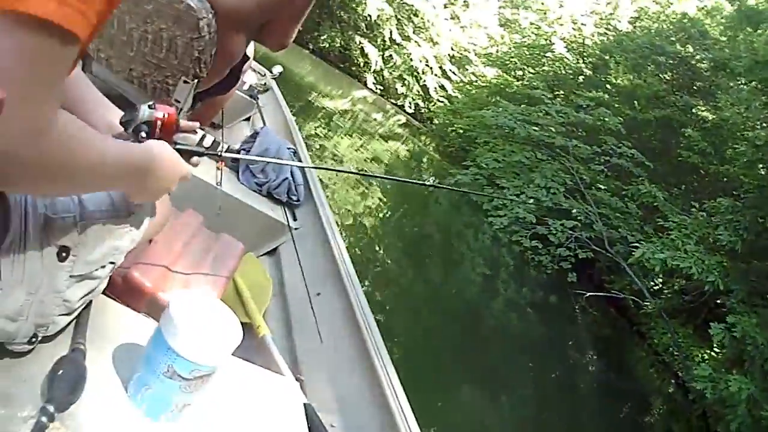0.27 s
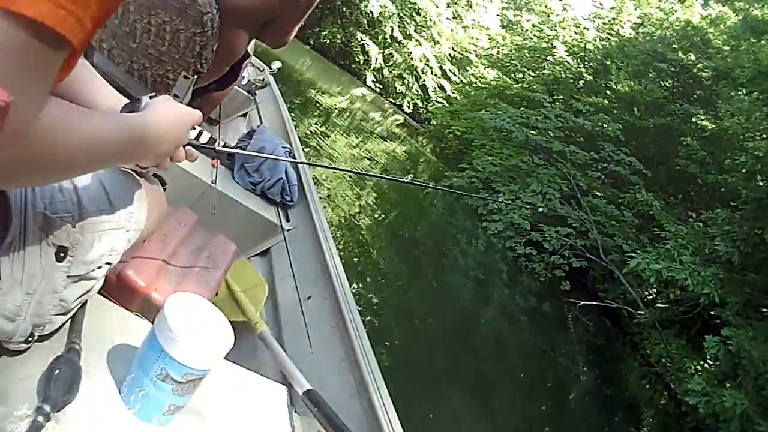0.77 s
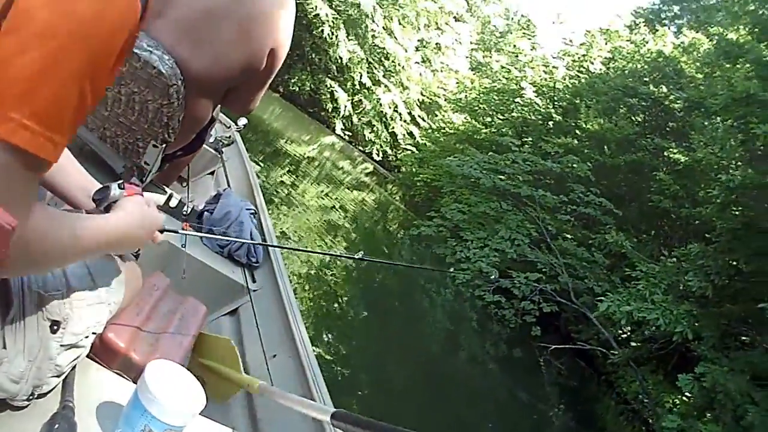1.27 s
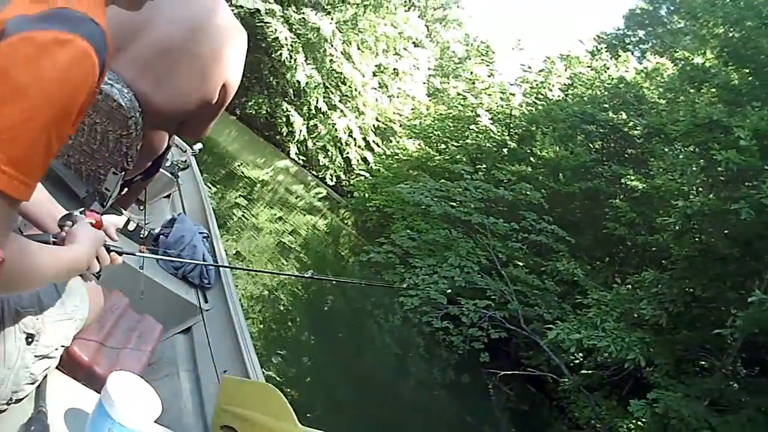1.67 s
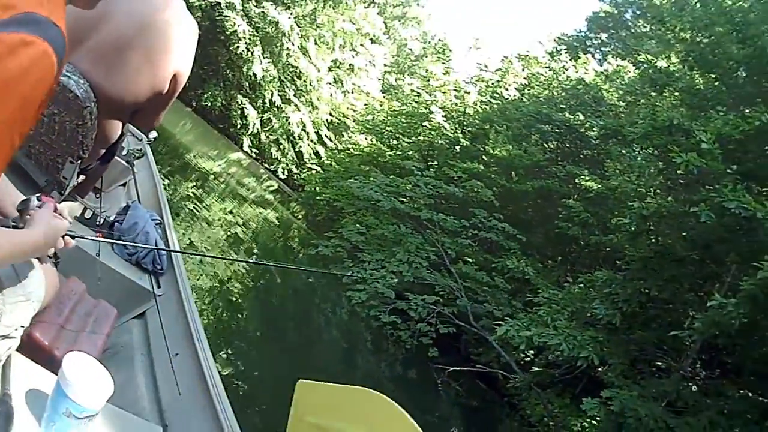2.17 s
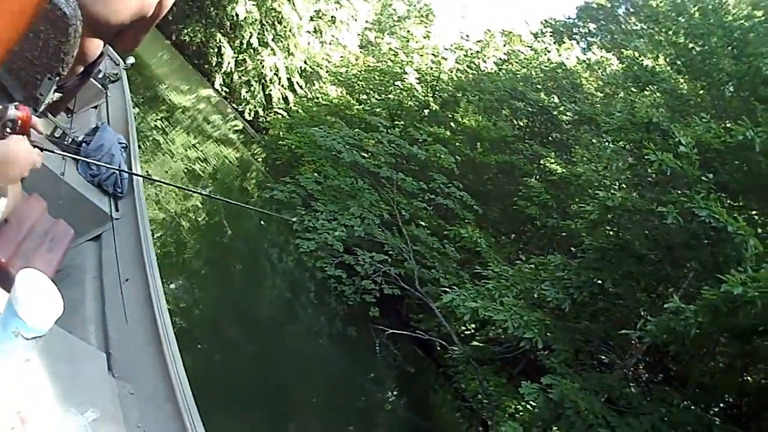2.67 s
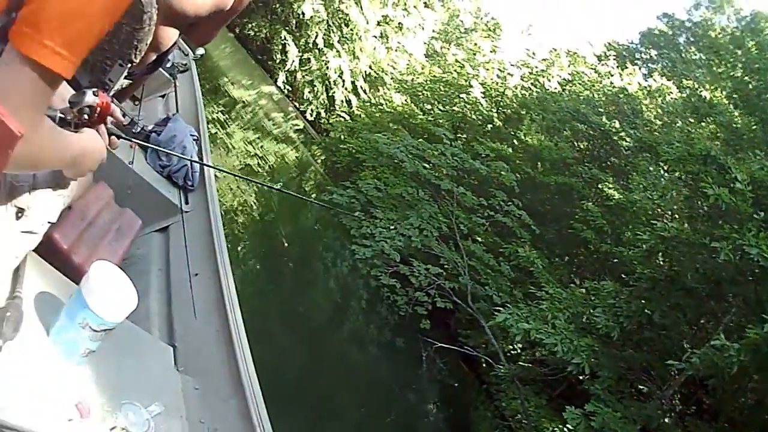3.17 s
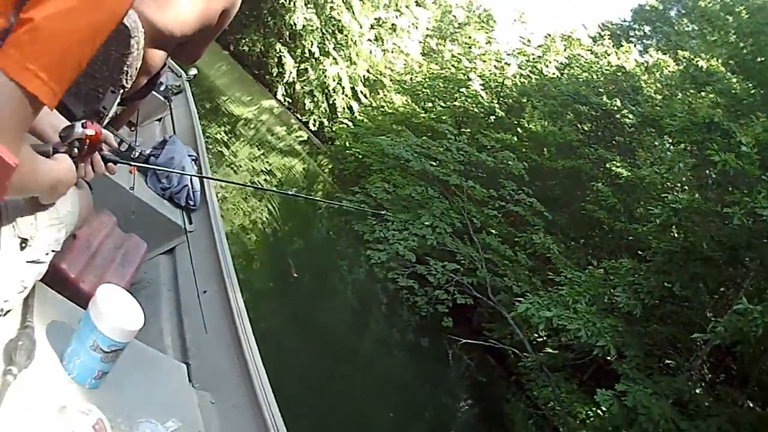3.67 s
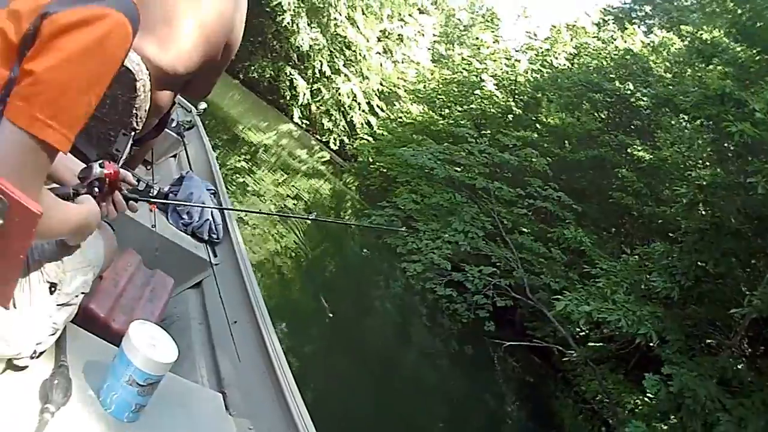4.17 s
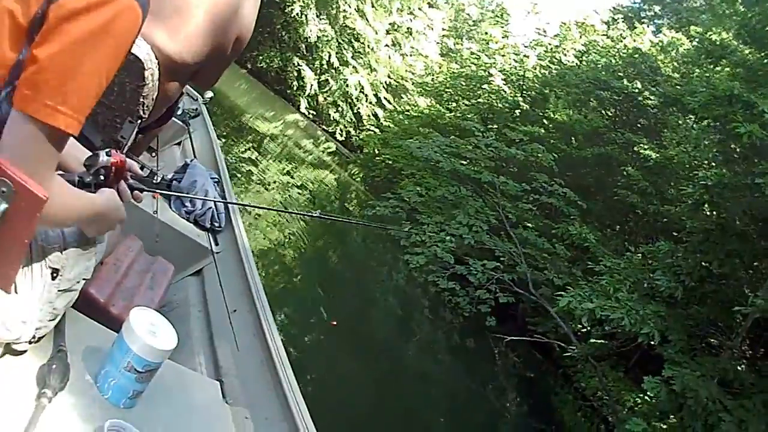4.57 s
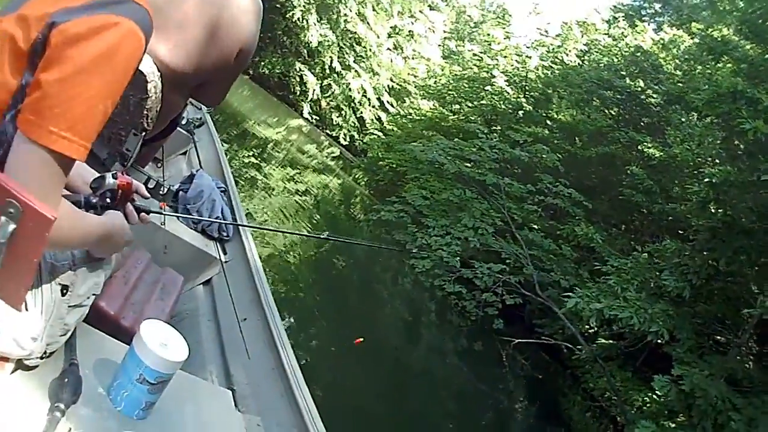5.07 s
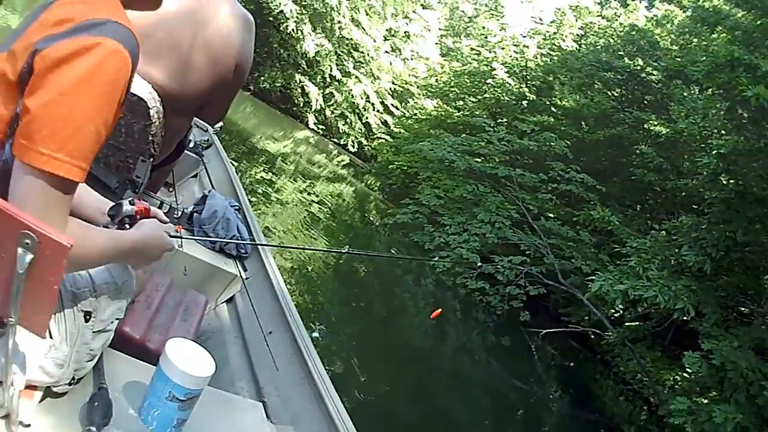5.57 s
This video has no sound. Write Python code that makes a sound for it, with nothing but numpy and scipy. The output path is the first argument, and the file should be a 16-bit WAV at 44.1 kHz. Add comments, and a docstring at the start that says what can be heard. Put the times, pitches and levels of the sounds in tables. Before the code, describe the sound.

A quiet wooded lake heard from inside a thin metal boat through a small, coarse camera microphone, almost mono. A distant cicada chorus holds a faint, narrow, noisy hum near 1 kHz over soft broad air, both slowly sinking. From 0.1 to 0.6 s a seat creaks in dull, low jolts, quickening from about 30 to 50 a second, ending with a light tick. A paddle then scrapes and knocks at 0.95-1.15 s, with a faint slide until 1.5 s. The sharpest clack comes at 1.55-1.65 s, ringing hollow around 300 and 800 Hz. More knocks at 2.12-2.45 s boom near 124 Hz with brief gritty rubs and a brighter tap at 2.35 s. Weak bumps follow at 3.15, 3.3 and 3.6 s. Afterwards only the insect hum and air remain, with soft wind rumbles around 4.4 s and stronger low puffs at 5.3-5.5 s.

```python
"""A seat creaks in slow jolts, then a paddle is dragged, knocked and lifted out of a thin metal boat.
Knocks set hull panels booming and ringing; sliding drives them with dense, uneven slips.
Under it all, cicadas drone near 1 kHz as narrow noise bands and the wooded lake adds smooth broad noise.
Light wind stirs the microphone from the start, with its last gusts after the knocks.
A small camera samples the sound 8000 times a second and joins the samples by straight lines."""
import sys
import numpy as np
from scipy import signal
from scipy.io import wavfile

SR = 44100
rng = np.random.default_rng(int(sys.argv[2]) if len(sys.argv) > 2 else 0)


def voltage_ratio(level):
    """Linear amplitude factor for a level in decibels (scalar or array-like)."""
    return 10 ** (np.asarray(level, float) / 20)


def wav_record(signal):
    """Record a signal, one row per channel, as 16-bit PCM in the file named by sys.argv[1]."""
    frames = np.transpose(np.atleast_2d(signal))
    bounded = np.clip(frames, -1, 1)
    # unit amplitude maps onto the largest positive 16-bit level
    quanta = np.round(bounded * 32767).astype(np.int16)
    wavfile.write(sys.argv[1], SR, quanta)


N = 257544


def rms_one(x):
    """Scale a signal to an rms of 1."""
    return x / np.sqrt(np.mean(x ** 2) + 1e-20)


def noise():
    """White noise over the whole scene."""
    return rng.standard_normal(N)


def butter(x, hz, kind, order=2):
    """Butterworth filter with its corner or corners at hz."""
    return signal.sosfilt(signal.butter(order, hz, kind, fs=SR, output="sos"), x)


def drift(rate_hz):
    """Slow random wander with an rms of 1: 40 joined points a second, low-passed at rate_hz."""
    points = rng.standard_normal(int(N / SR * 40) + 2)
    wander = np.interp(np.arange(N) / SR * 40, np.arange(len(points)), points)
    return rms_one(butter(wander, rate_hz, "low"))


def resonance(x, hz, width_hz):
    """Two-pole band filter: a wider band means a faster dying resonance."""
    r = np.exp(-np.pi * width_hz / SR)
    feedback = [2, -4 * r * np.cos(2 * np.pi * hz / SR), 2 * r * r]
    return signal.lfilter([1 - r * r, 0, r * r - 1], feedback, x)


def ring(clicks, hz, t60_s):
    """A unit click sets a sine of height 1 ringing, down 60 dB after t60_s."""
    r = voltage_ratio(-60 / (t60_s * SR))
    w = 2 * np.pi * hz / SR
    return signal.lfilter([0, np.sin(w)], [1, -2 * r * np.cos(w), r * r], clicks + 1e-18)


def nearness(hz, centre_hz, octaves):
    """Panels far in pitch from the centre are driven less."""
    return 1 / (1 + (np.log2(hz / centre_hz) / octaves) ** 2) ** 2


# ringing hull panels, for knocks and rubs alike: pitch_hz [Hz], level_db [dB], t60_s [s]
HULL_PANELS = [(100, 0.5, 0.74), (125.5, -3, 0.55), (150.4, 4, 0.29), (188, -4.5, 0.48), (231, 0, 0.62),
               (268, -5, 0.32), (294, 1.5, 0.11), (342, 2.5, 0.11), (380, 5, 0.039), (422.6, -6.5, 0.31),
               (486.3, -4, 0.17), (514, 0.5, 0.098), (571, -2, 0.077), (621, -5.5, 0.14), (720, -6.5, 0.12),
               (784.4, 2, 0.091), (823, 4, 0.027), (918, -2.5, 0.18), (1011, -3, 0.064), (1150, -20, 0.094),
               (1368, -13.5, 0.036), (1530, -4, 0.069), (1750, 1, 0.01), (1950, 2.5, 0.036),
               (2110, 1, 0.04), (2220, -1.5, 0.017), (2870, 1.5, 0.018), (2930, 1, 0.028), (3200, -25, .03),
               (3550, 6.5, 0.0049)]
# contacts and rings of the knocks; narrow rows are single panels ringing on, near 124 Hz the whole hull booms:
# start_s [s], level_db [dB], centre_hz of the panels driven [Hz], reach [octaves], crack_db [dB]
KNOCK_RINGS = [(.585, -51, 366, 0.83, -48.5), (0.591, -46.5, 132, 0.43, -72),
               (0.943, -46.5, 430, 1.14, -73), (1.044, -33, 543, 0.75, -48), (1.084, -36.5, 534, 1.33, -42),
               (1.1, -39, 175, 0.41, -73), (1.127, -46, 600, 0.57, -55), (1.553, -45, 750, 0.41, -35.5),
               (1.571, -31.5, 790, 0.52, -28), (1.57, -40.5, 129, 0.4, -60), (1.576, -38, 244, 0.13, -59),
               (1.58, -39, 800, 0.58, -26), (1.587, -27.5, 311, 0.21, -60), (1.651, -38, 1530, 0.91, -58),
               (1.656, -45, 124, 0.61, -70), (1.846, -58, 1970, 0.5, -71), (1.983, -57.5, 2460, 0.61, -56),
               (2.117, -50, 1750, 0.27, -38), (2.136, -36.5, 600, 0.5, -33.5),
               (2.133, -33.5, 124, 0.17, -60), (2.134, -32.5, 342, 0.14, -60), (2.14, -45, 1500, 0.72, -39),
               (2.208, -39.5, 660, 1.83, -26), (2.206, -36.5, 121, 0.38, -50),
               (2.255, -49.5, 270, 0.47, -52), (2.345, -31, 1630, 0.27, -33), (2.342, -39, 475, 0.29, -69),
               (2.34, -41, 170, 0.69, -58), (2.387, -36, 1950, 0.14, -37.5), (2.429, -40.5, 125, 0.22, -73),
               (3.147, -52, 660, 0.89, -48), (3.3, -55.5, 280, 0.32, -58), (3.607, -56, 514, 1.2, -48)]


def knocks():
    """Each row sets the panels near its pitch ringing and gives a short crack."""
    start_s, row_db, centre_hz, octaves, crack_db = np.transpose(KNOCK_RINGS)
    at = np.round(start_s * SR).astype(int)
    chance = rng.random((len(at), len(HULL_PANELS), 3))
    ringing = np.zeros(N)
    for k, (pitch_hz, level_db, t60_s) in enumerate(HULL_PANELS):
        near = voltage_ratio(row_db) * nearness(pitch_hz, centre_hz, octaves)
        # each ring varies by up to 3 dB either way, with random polarity
        strength = voltage_ratio(level_db + 6 * (chance[:, k, 0] - 0.5)) * np.sign(chance[:, k, 1] - 0.5)
        # slow bending waves reach the low panels later
        late = ((0.77 + chance[:, k, 2] * 1.25) / pitch_hz * SR).astype(int)
        clicks = np.zeros(N)
        np.add.at(clicks, at + late, near * strength)
        ringing += ring(clicks, pitch_hz, t60_s)
    cracks = np.zeros(N)
    np.add.at(cracks, at, voltage_ratio(crack_db))
    # a hard first tick, then splintered noise falling 60 dB in 22 ms
    tick = 14 * butter(cracks, [700, 3000], "band", order=1)
    dying = signal.lfilter([1], [1, -voltage_ratio(-60 / (0.022 * SR))], cracks + 1e-18)
    splinters = rms_one(butter(noise(), [800, 3000], "band", order=1)) * dying
    return ringing + tick + splinters


# paddle sliding on metal: start_s [s], end_s [s], level_db [dB, before 20 dB of gain],
# centre_hz of the panels rubbed [Hz], reach [octaves]
PADDLE_RUBS = [(0, 0.084, -72.5, 1960, 1.46), (0.982, 1.065, -70.5, 1220, 0.79),
               (1.029, 1.089, -71, 910, 2.8), (1.087, 1.145, -63, 825, 2.25), (1.132, 1.216, -71, 353, 3.2),
               (1.213, 1.51, -74.5, 1680, 1.5), (1.549, 1.591, -55.5, 970, 2.9),
               (1.587, 1.655, -66, 910, 2.3), (1.646, 1.723, -63.5, 980, 2.46),
               (2.119, 2.201, -65, 1430, 2.3), (2.199, 2.25, -65.5, 1350, 2.7),
               (2.331, 2.414, -67, 1530, 2.7), (3.141, 3.16, -67, 910, 1.6), (3.206, 3.288, -72, 318, 0.82),
               (3.601, 3.617, -68.5, 694, 2.34)]


def rubs():
    """Dense uneven slips drive the panels while the paddle slides."""
    t = np.arange(N) / SR
    edge_s, slips_per_s = 0.0074, 1500
    when = rng.random(N) < slips_per_s / SR
    sizes = voltage_ratio(3.0 * np.minimum(rng.exponential(1, N), 4))
    slips = rms_one(when * sizes * rng.choice([-1, 1], N))
    slips = slips * voltage_ratio(1.5 * drift(24.0))
    strokes = []
    for start_s, end_s, level_db, centre_hz, octaves in PADDLE_RUBS:
        shape = np.clip(np.minimum(t - start_s, end_s - t) / edge_s, 0, 1)
        strokes.append((voltage_ratio(level_db) * shape, centre_hz, octaves))
    rubbing = np.zeros(N)
    for k, (pitch_hz, level_db, t60_s) in enumerate(HULL_PANELS):
        push = sum(stroke * nearness(pitch_hz, centre_hz, octaves)
                   for stroke, centre_hz, octaves in strokes)
        # the paddle resting on the metal damps the ring
        damped = ring(slips * push, pitch_hz, 0.35 * t60_s)
        # short rings are lifted against long ones
        rubbing += (-1) ** k * voltage_ratio(level_db) * damped * np.sqrt(14 / (t60_s * SR))
    return voltage_ratio(20.0) * rubbing


# the seat creaking as weight shifts: time_s [s], slip_rate [slips per s], level_db [dB]
SEAT_CREAK = [(.076, 30, -46.5), (0.201, 29, -42), (0.327, 33.2, -41.5), (0.351, 42.5, -42.5),
              (.5, 42.5, -39.5), (0.573, 50, -43)]
# dull modes of the seat: pitch_hz [Hz], level_db [dB], t60_s [s]
SEAT_MODES = [(153.4, -1, 0.1), (200, -6, 0.054), (288, -8, 0.037), (409, -6.5, 0.054), (460, -8.5, 0.03),
              (636, -9.5, 0.014)]


def creak():
    """Stick and slip: near-regular soft jolts ring the seat's dull modes."""
    t = np.arange(N) / SR
    time_s, slip_rate, level_db = np.transpose(SEAT_CREAK)
    # one slip each time the running count passes a whole number
    count = np.cumsum(np.interp(t, time_s, slip_rate, left=0, right=0)) / SR
    at = np.flatnonzero(np.diff(np.ceil(count)))
    chance = rng.normal(0, 1, (len(at), 2))
    # spread of 0.7 ms in timing and 1.5 dB in level
    shift = (0.0007 * SR * chance[:, 0]).astype(int)
    jolts = np.zeros(N)
    jolts[at + shift] = voltage_ratio(np.interp(t[at], time_s, level_db) + 1.5 * chance[:, 1])
    return sum((-1) ** k * voltage_ratio(mode_db) * ring(jolts, pitch_hz, t60_s)
               for k, (pitch_hz, mode_db, t60_s) in enumerate(SEAT_MODES))


# bands of the far chorus: pitch_hz [Hz], width_hz of the first of two filters [Hz], level_db [dB]
CICADA_BANDS = [(1068, 67.6, 1), (961, 160, -5), (1230, 200, -17.5), (1590, 120, -17.5), (1980, 200, -20)]


def cicadas():
    """Thousands of far insects merge into a few narrow bands of noise."""
    chorus = 0
    for pitch_hz, width_hz, level_db in CICADA_BANDS:
        band = resonance(noise(), pitch_hz, width_hz)
        band = resonance(band, pitch_hz, 1.93 * width_hz)
        chorus = chorus + voltage_ratio(level_db) * rms_one(band)
    return rms_one(chorus) * voltage_ratio(1.0 * drift(36.0))


# colour of the outdoor air: pitch_hz [Hz], level_db [relative dB per Hz]
AIR_COLOUR = [(60, 24), (130, 16), (250, 10.5), (500, 4.5), (900, 6.5), (1400, -6), (2000, -2), (2800, -6),
              (3700, 0.5)]


def air():
    """Leaves, water and distance: smooth noise in half-octave bands, each wavering by about 1 dB."""
    pitch_hz, level_db = np.transpose(AIR_COLOUR)
    edges = 50 * 2 ** np.arange(0, 6.6, 0.5)
    white = [noise(), noise()]  # neighbouring bands take different noises
    rustle = 0
    for k, (low, high) in enumerate(zip(edges, edges[1:])):
        colour_db = np.interp(np.log(low * high) / 2, np.log(pitch_hz), level_db)
        gain = voltage_ratio(colour_db + 1.0 * drift(18.0))
        rustle = rustle + gain * butter(white[k % 2], [low, high], "band")
    # level 1 is set in the 1.4 to 3 kHz band
    return rustle / np.std(butter(rustle, [1400, 3000], "band"))


# wind gusts: middle_s [s], length_s [s], peak_db [dB, added to the calm wind]
WIND_GUSTS = [(0.02, 0.078, -46.5), (0.406, 0.25, -51), (0.674, 0.05, -57), (2.28, .1, -46),
              (3.163, 0.055, -46), (4.392, 0.8, -52), (4.782, 0.13, -51.5), (5.32, 0.14, -42),
              (5.51, 0.11, -40.5), (5.72, .06, -55)]


def wind():
    """Lumpy low rumble of air pressure on the microphone port, swelling with each gust."""
    t = np.arange(N) / SR
    calm_db = -54.5
    rumble = butter(butter(noise(), 30.9, "low", order=3), 7.0, "high")
    lumpy = rms_one(rumble * voltage_ratio(3.0 * drift(6.9)))
    strength = voltage_ratio(calm_db) + sum(voltage_ratio(peak_db) * np.exp(-(2 * (t - middle_s) / length_s) ** 2)
                                  for middle_s, length_s, peak_db in WIND_GUSTS)
    return strength * lumpy


def scene():
    """All sources reach one microphone; the background sinks slowly."""
    t = np.arange(N) / SR
    cicadas_db, cicadas_fade_db_per_s = -54, 0.87
    air_db, air_fade_db_per_s = -66.5, 1.31
    chorus = voltage_ratio(cicadas_db - cicadas_fade_db_per_s * t) * cicadas()
    outdoors = chorus + voltage_ratio(air_db - air_fade_db_per_s * t) * air()
    mono = knocks() + rubs() + creak() + outdoors + wind()
    return np.array([mono, mono])


def band_limit(x):
    """A steep low-pass at the top of the band."""
    return signal.sosfilt(signal.butter(12, 15150, fs=SR, output="sos"), x)


def record(dry):
    """Straight lines between slow samples mirror the spectrum above 4 kHz; the left lags by one of them."""
    t = np.arange(N) / SR
    camera_rate_hz = 8000
    hiss_db = -80.5  # before its low-pass
    ticks = np.arange(-1, t[-1] * camera_rate_hz + 2) / camera_rate_hz
    samples = np.interp(ticks, t, butter(dry[0], 5770, "low", order=3))
    left = np.interp(t - 1 / camera_rate_hz, ticks, samples)
    right = np.interp(t, ticks, samples)
    # faint separate hiss in each channel
    hiss = voltage_ratio(hiss_db) * butter(rng.standard_normal((2, N)), 3400, "low")
    mix = np.array([left, right]) + hiss
    return band_limit(mix)


dry = scene()
out = record(dry)
wav_record(out)
```